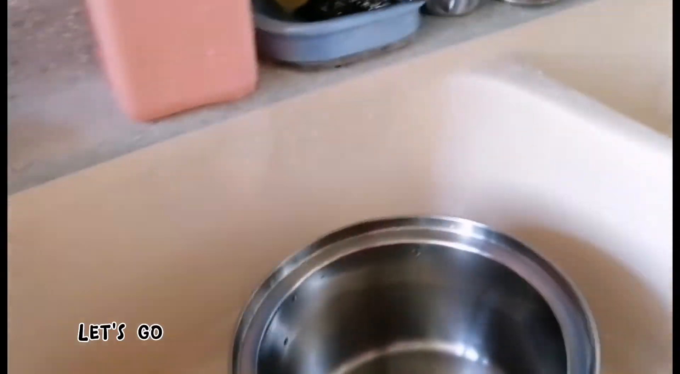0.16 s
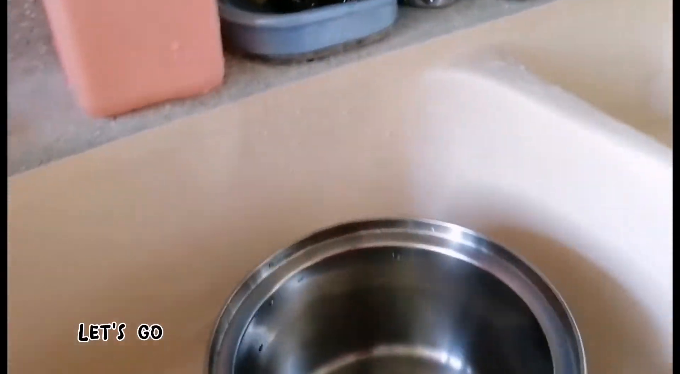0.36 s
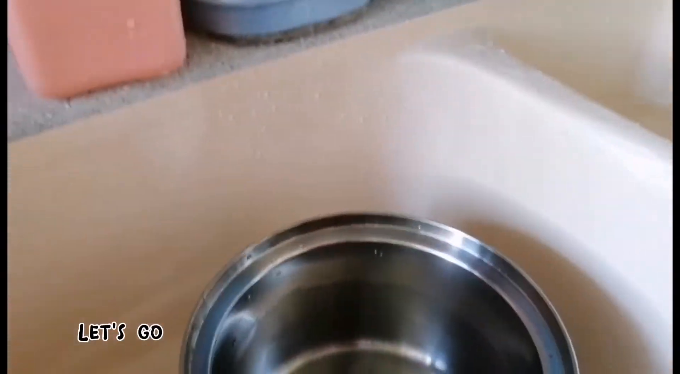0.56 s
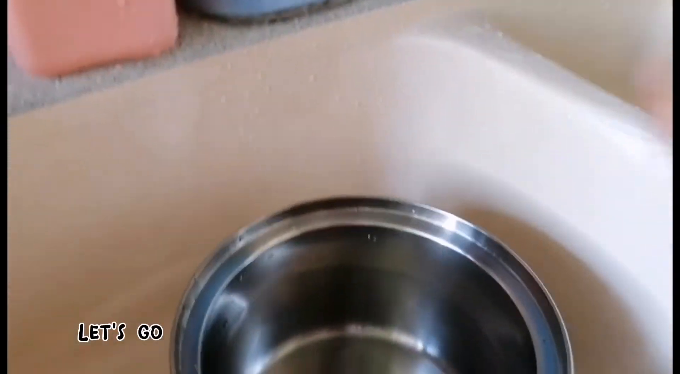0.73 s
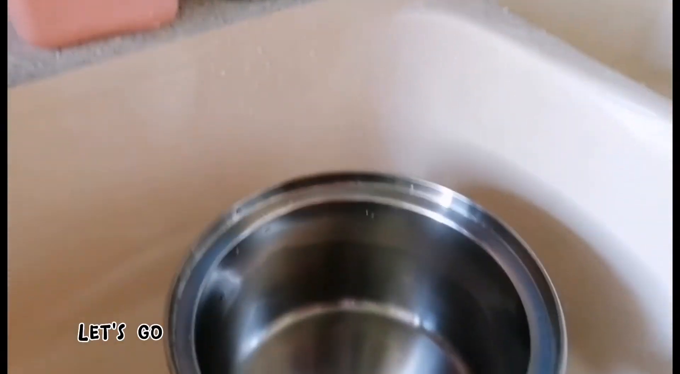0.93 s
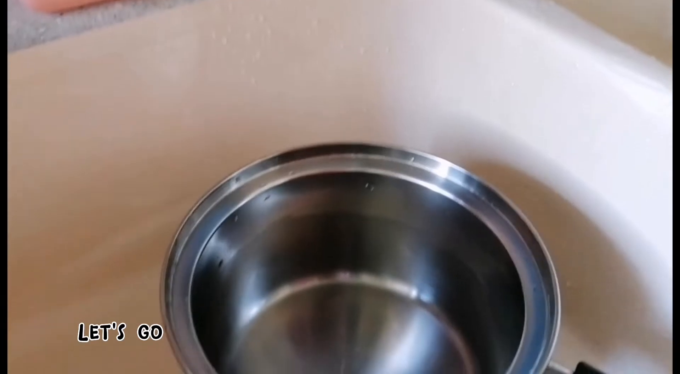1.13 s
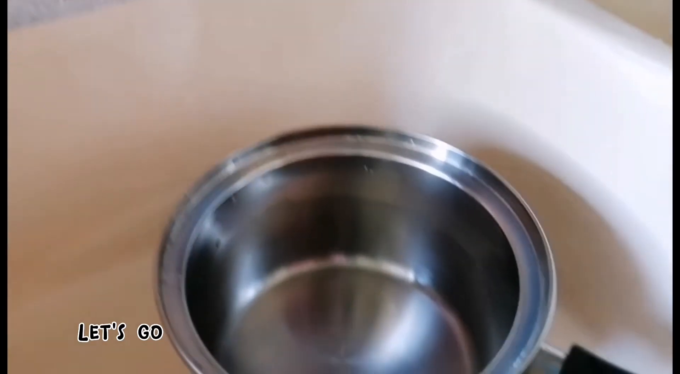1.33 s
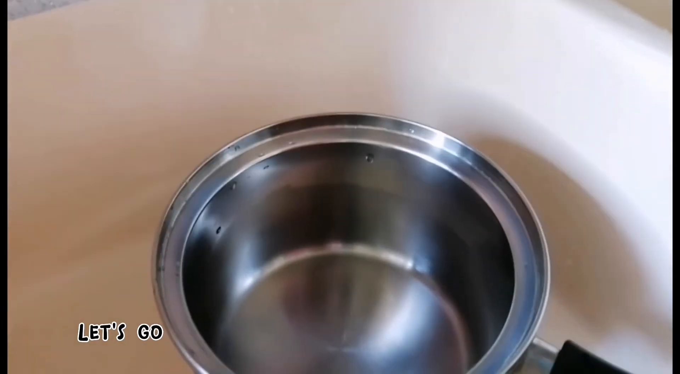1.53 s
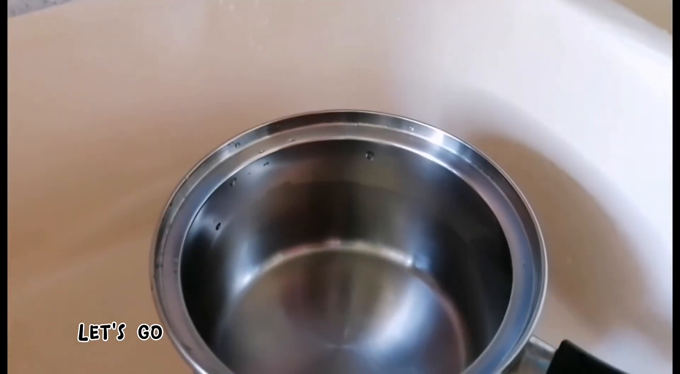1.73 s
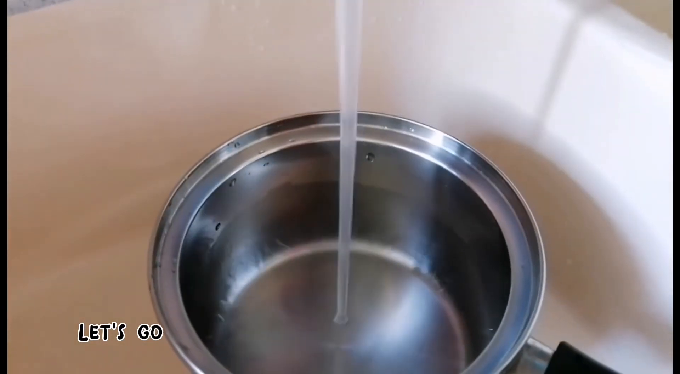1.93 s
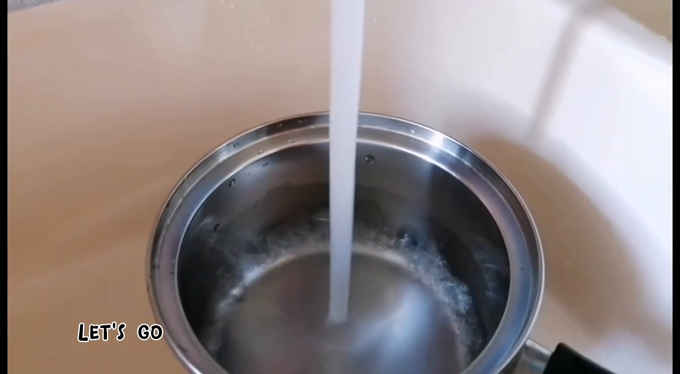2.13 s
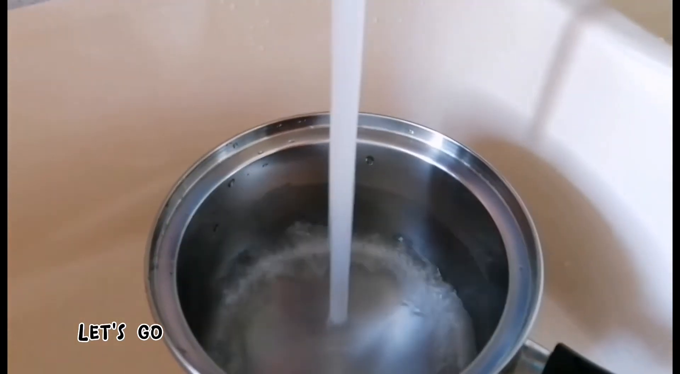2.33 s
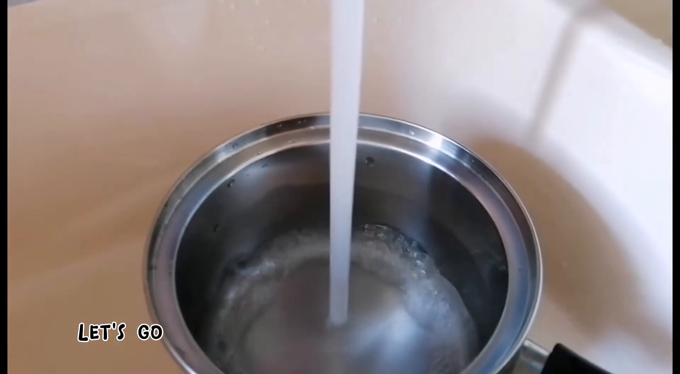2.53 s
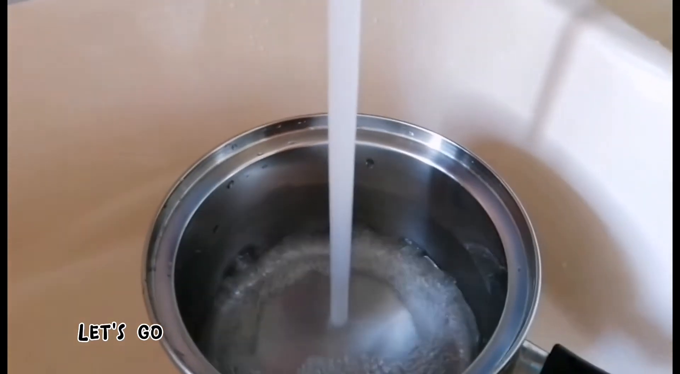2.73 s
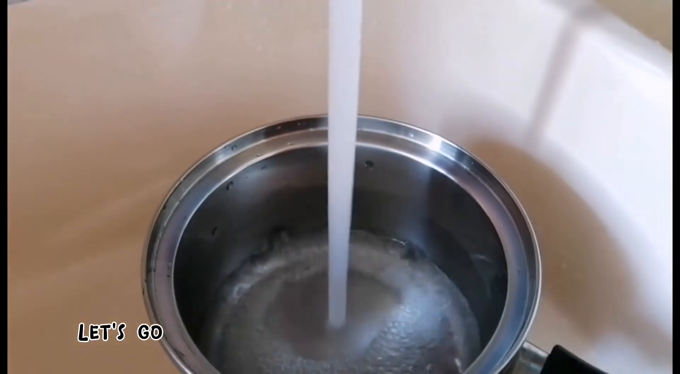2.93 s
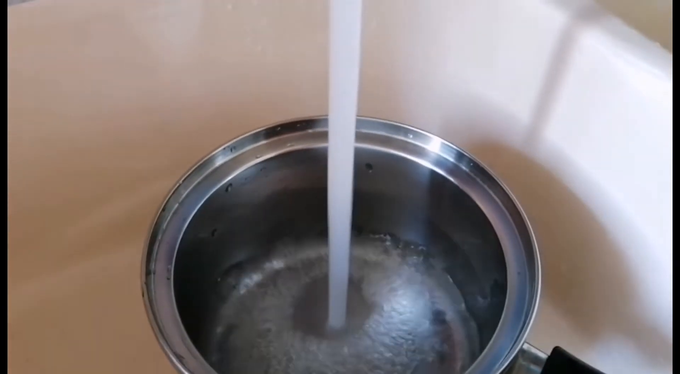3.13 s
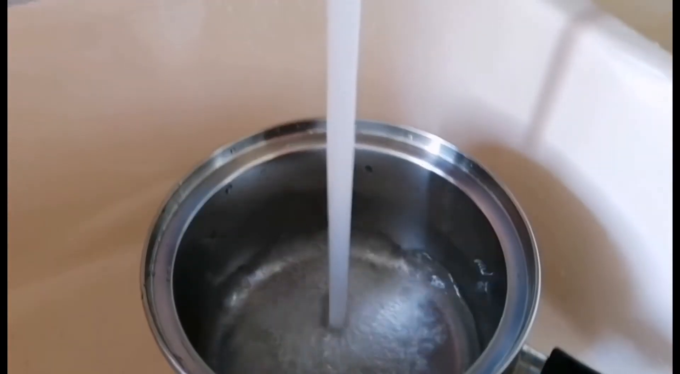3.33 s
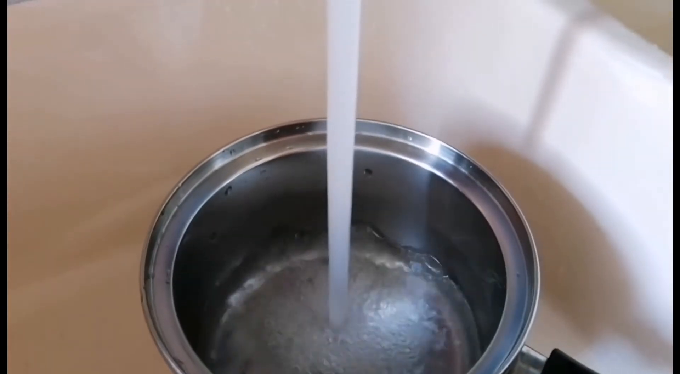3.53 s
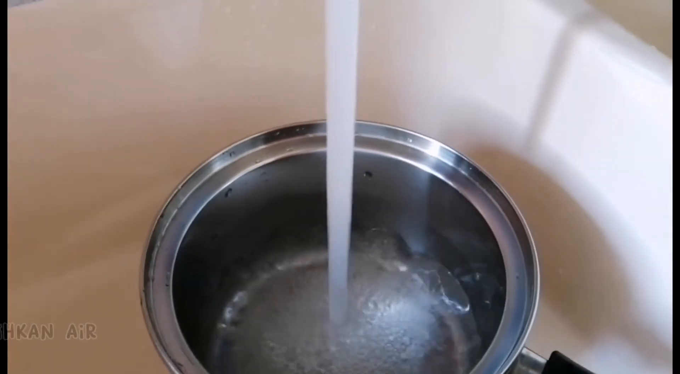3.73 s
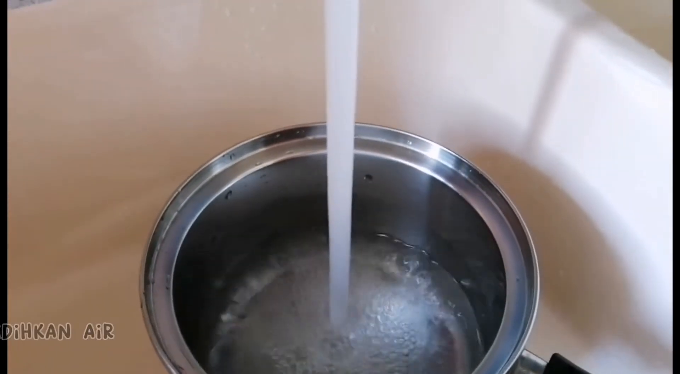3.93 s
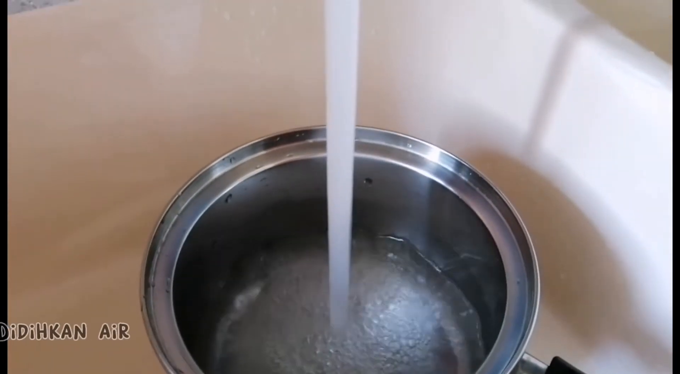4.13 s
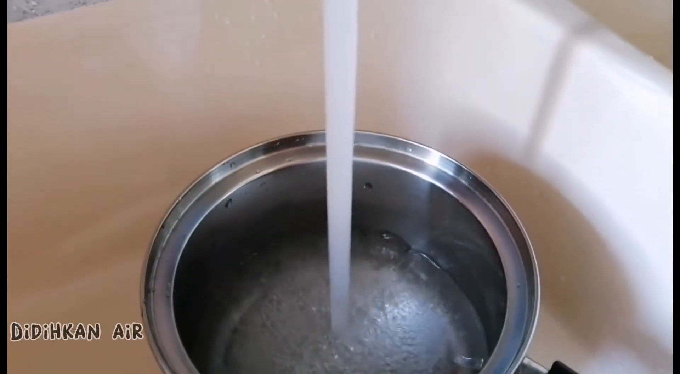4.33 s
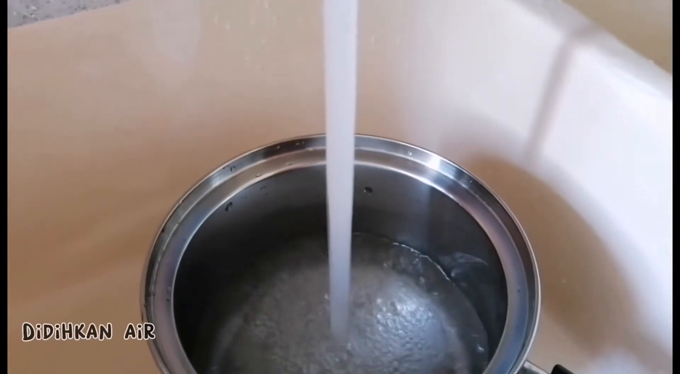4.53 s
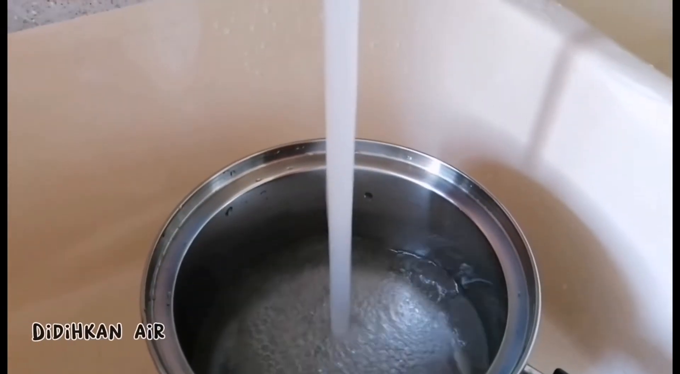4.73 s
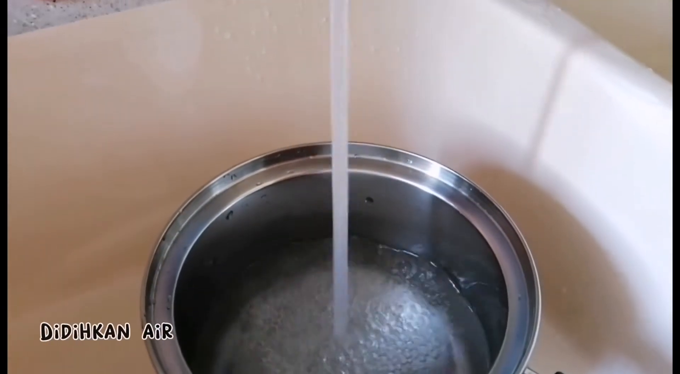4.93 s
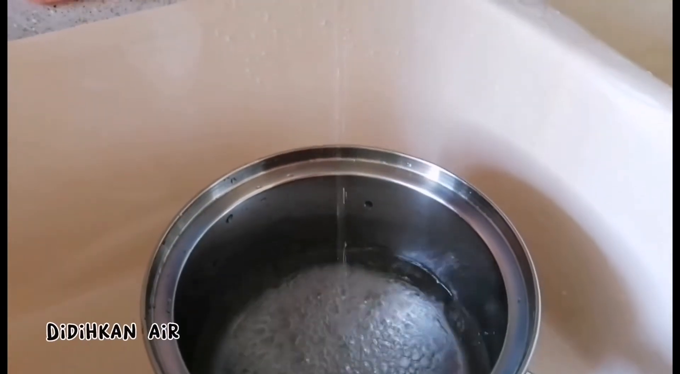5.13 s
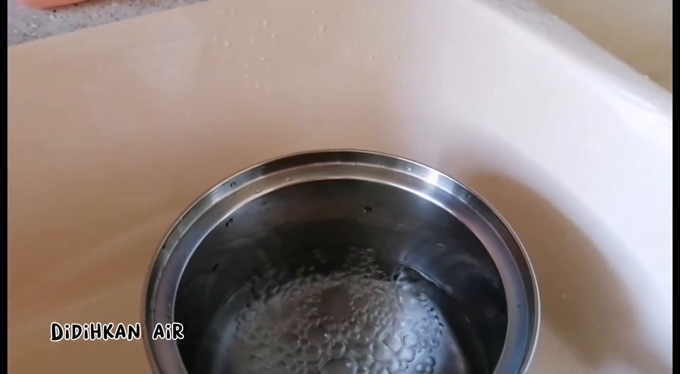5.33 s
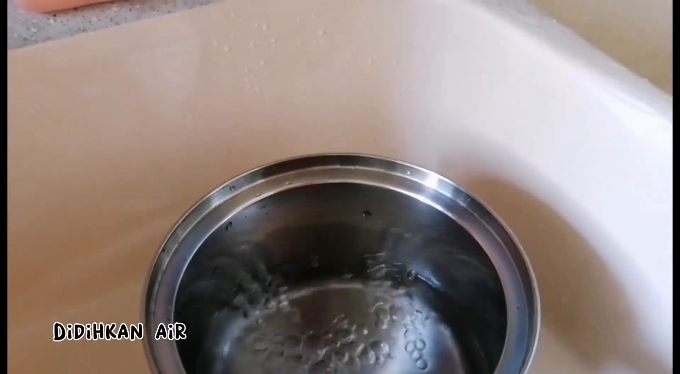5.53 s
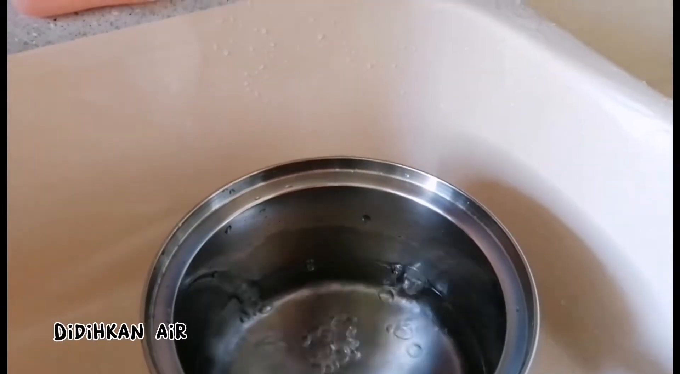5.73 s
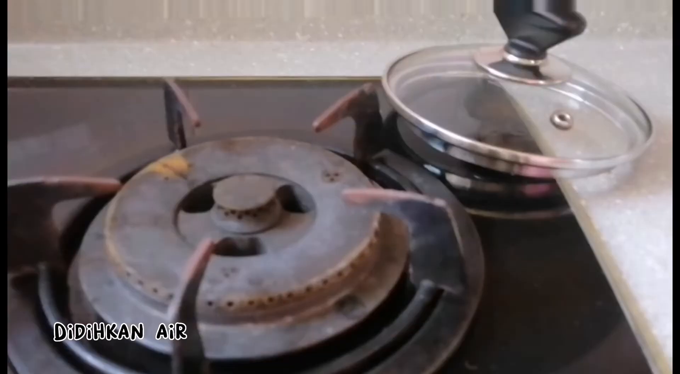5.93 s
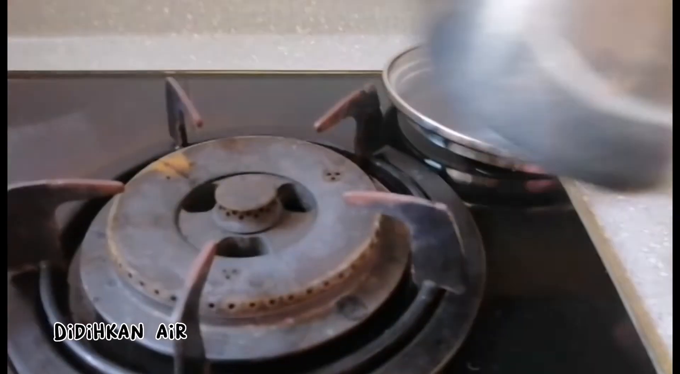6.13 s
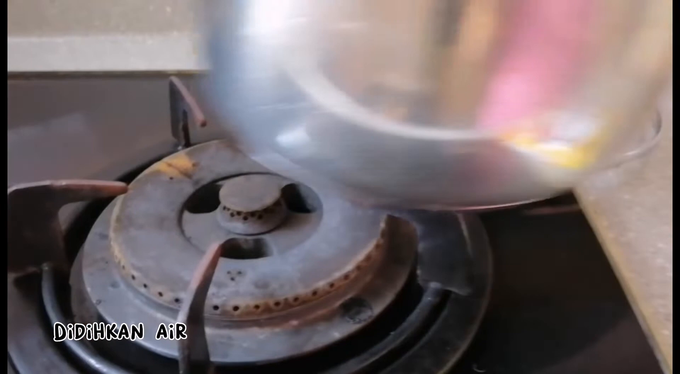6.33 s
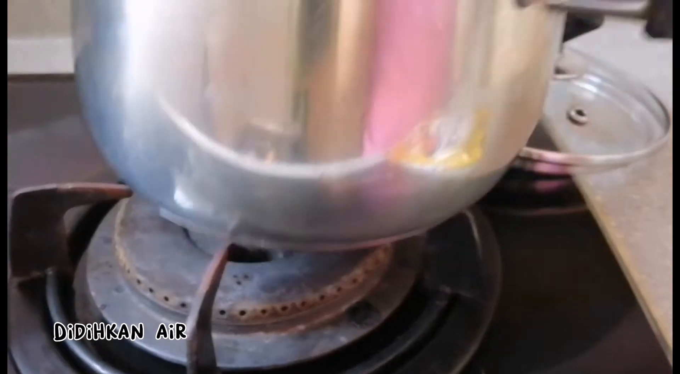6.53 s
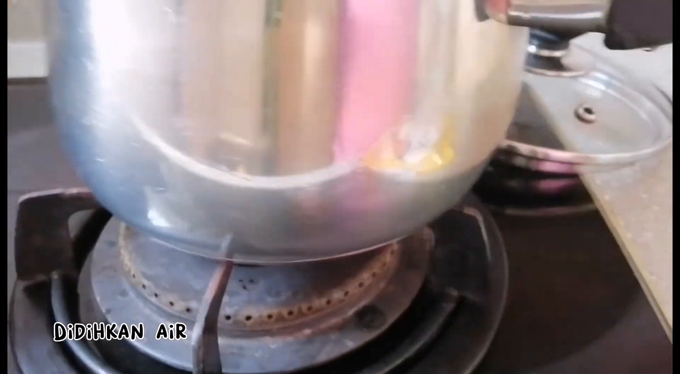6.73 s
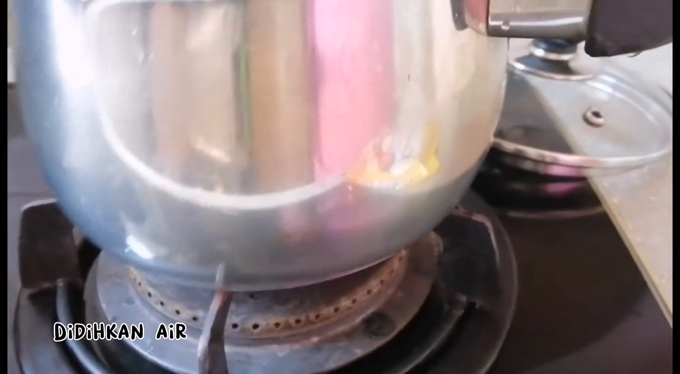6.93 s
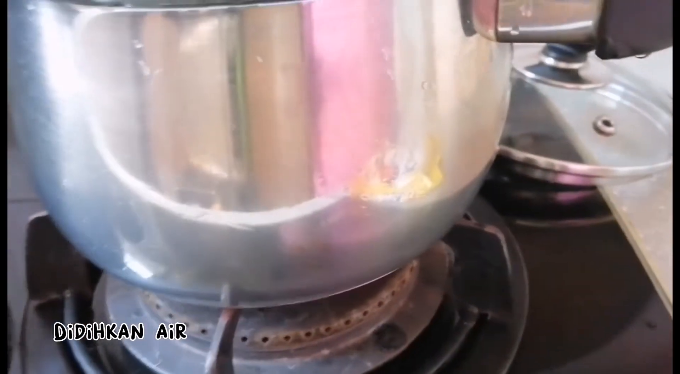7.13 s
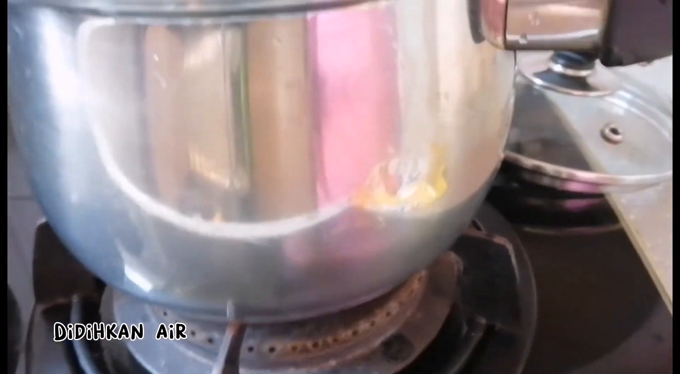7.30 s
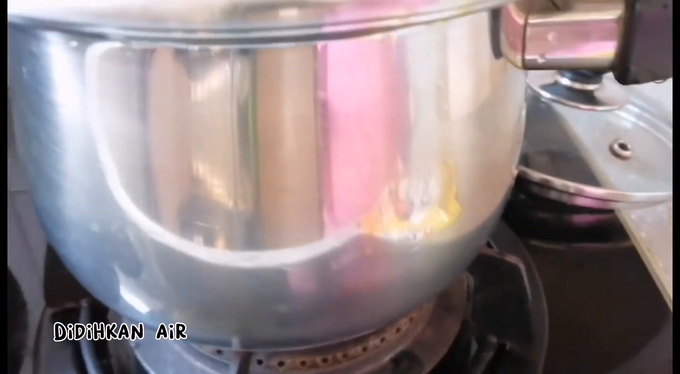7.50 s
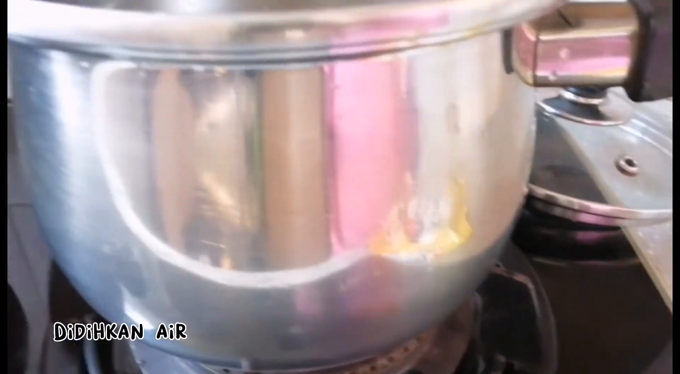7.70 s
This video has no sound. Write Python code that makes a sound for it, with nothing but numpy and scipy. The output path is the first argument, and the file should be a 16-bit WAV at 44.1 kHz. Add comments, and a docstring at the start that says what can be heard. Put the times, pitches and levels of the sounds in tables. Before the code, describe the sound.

Close up in a small kitchen with low appliance hum, an empty steel pot clanks hollowly in a sink and is nudged. A tap opens with a bright splashing hiss on bare metal, which turns deeper and gurgling as water gathers, then shuts off with trickle, drips and fizzing bubbles. After a brief total silence, the full pot bumps onto an iron grate and scrapes with short metallic squeals. Hand-held stereo phone microphone.

```python
"""In a kitchen, from close by, a hand-held phone with two microphone ports hears an empty steel pot set in the sink.
The tap opens, fills it and is shut, and the froth fizzes out: shaped noise, random droplet clicks, ringing modes.
After a silent pause the full pot is lowered onto a stove's iron grate, catches and is slid into place:
stick-slip clicks drive its modes. Hum, air and breeze lie behind; the room answers the blows."""
import sys
import numpy as np
from scipy import signal
from scipy.io import wavfile
from scipy.ndimage import uniform_filter1d

SR = 44100
rng = np.random.default_rng(int(sys.argv[2]) if len(sys.argv) > 2 else 0)


def wav_out(sig):
    """Save sig, one row per channel (or a flat mono array), as 16-bit PCM at SR to the path in sys.argv[1]."""
    wavfile.write(sys.argv[1], SR, np.round(np.clip(np.atleast_2d(sig).T, -1, 1) * 32767).astype(np.int16))


N = 342216


def from_db(db):
    """Amplitude factor of a level in dB."""
    return 10 ** (np.asarray(db) / 20)


def rms_one(x):
    """Scale to an overall rms of 1."""
    return x / np.sqrt(np.mean(x ** 2) + 1e-20)


def panned(pan_db):
    """Left and right gains; pan_db is how much louder the left port is."""
    return from_db(np.array([pan_db / 2, -pan_db / 2]))


def in_time(rows):
    """First sample of the span, and each column interpolated at every sample."""
    s, *columns = np.transpose(rows)
    at = np.arange(round(s[0] * SR), min(round(s[-1] * SR), N))
    return at[0], [np.interp(at / SR, s, c) for c in columns]


def add(out, start, sound):
    """Mix a sound in from a sample on, cut at the end."""
    start = max(start, 0)
    out[:, start:start + sound.shape[-1]] += sound[..., :N - start]


def at_hz(points, hz):
    """Level at a frequency, interpolated over log frequency."""
    points = np.array(points)
    return np.interp(np.log(hz), np.log(points[:, 0]), points[:, 1])


def ramp(t, start, length):
    """Straight rise from 0 to 1."""
    return np.clip((t - start) / length, 0, 1)


def shape_db(t, start, end, rise_db_per_s, fall_db_per_s):
    """0 dB from start to end, straight slopes in dB before and after."""
    return -rise_db_per_s * np.maximum(start - t, 0) - fall_db_per_s * np.maximum(t - end, 0)


def drift(rate, size):
    """Slow random wander of rms 1: noise low-passed near rate (Hz), made at every 40th sample."""
    r = np.exp(-80 * np.pi * rate / SR)
    noise = rng.standard_normal(size // 40 + 1002)
    slow = signal.lfilter([1], [1, -2 * r, r * r], noise)[1000:]
    return np.interp(np.arange(size) / 40, np.arange(len(slow)), rms_one(slow))


def band(x, low_hz, high_hz):
    """Keep one frequency band."""
    return signal.sosfilt(signal.butter(2, [low_hz, high_hz], "band", fs=SR, output="sos"), x)


def resonate(x, hz, width_hz):
    """Two-pole resonance with about unit gain at its peak."""
    r = np.exp(-np.pi * width_hz / SR)
    poles = [1, -2 * r * np.cos(2 * np.pi * hz / SR), r * r]
    return signal.lfilter(np.array([1, 0, -1]) * (1 - r * r) / 2, poles, x)


def ring(clicks, hz, t60, lead=0.):
    """A unit click starts a decaying sine of height 1; the left port leads by lead radians; the pitch may move."""
    spin = np.exp(2j * np.pi * np.cumsum(hz + 0 * clicks) / SR)
    decay = from_db(-60 / (t60 * SR))
    turn = spin * signal.lfilter([1], [1, -decay], (clicks + 1e-18) / spin)
    return np.array([turn.imag, (turn * np.exp(-1j * lead)).imag])


def wavering(hz, rate, lead, steady):
    """A mode driven partly by chance: a sine that swells and slips in phase; rms 1."""
    size = len(hz)
    swing = steady
    for share, r in ((0.71, rate), (0.49, 3 * rate)):
        swing = swing + share * (drift(r, size) + 1j * drift(r, size))
    turn = swing * np.exp(2j * np.pi * np.cumsum(hz) / SR)
    return rms_one(np.array([turn.real, (turn * np.exp(-1j * lead)).real]))


def grains(per_s, spread_db, size):
    """Random clicks of uneven size; their mean power does not depend on the rate."""
    sizes = from_db(spread_db * np.minimum(rng.exponential(1, size), 5)) * rng.choice([-1, 1], size)
    return rms_one(sizes) * (rng.random(size) < per_s / SR) * np.sqrt(SR / per_s)


# How alike the two ports hear a diffuse sound.
# Each row: frequency in Hz, left-right likeness from -1 to 1.
LIKENESS = [(30, .3), (130, 0.066), (400, 0.87), (640, -0.37), (1000, -0.12), (3000, -0.15), (7000, -0.17),
            (15000, -0.35)]


def banded(source, level_db, low_hz, patchy_db, top_hz=17000):
    """About third-octave bands of two sources, each with its own level, flicker and likeness at the ports."""
    size = source.shape[-1]
    out, together = 0, drift(36, size)
    edges = np.geomspace(low_hz, top_hz, round(3 * np.log2(top_hz / low_hz)))
    for k, (low, high) in enumerate(zip(edges, edges[1:])):
        mid, side = band(source, low, high) * (-1) ** k
        hz = np.sqrt(low * high)
        alike = np.clip(at_hz(LIKENESS, hz), -1, 1)
        flicker = np.minimum(0.51 * together + drift(18, size), 2)
        gain = from_db(level_db(hz) + patchy_db * flicker)
        out = out + gain * (np.sqrt(1 + alike) * mid + np.sqrt(1 - alike) * side * [[1], [-1]])
    return out


# Level of the low hum, one list at the sink and one at the stove. Each row: time in seconds, level in dB.
HUM_LEVEL = [
    [(0.0, -57.5), (1.5, -53.5), (2.3, -66.5), (3.4, -68.5), (3.95, -59), (4.8, -58.5), (5.6, -51.5),
     (5.91, -51)],
    [(6.32, -57.5), (6.75, -67), (7.05, -51.5), (7.76, -59.5)],
]
# Colour of the appliance hum. Each row: frequency in Hz, band weight in dB.
HUM_COLOUR = [(24, -33), (40, -2.5), (150, -2.5), (240, -9), (462, -9.5), (541, -17), (581, -14),
              (853, -29.5), (1200, -29), (1560, -56.5), (2640, -120)]
# Motor drone within the hum. Each row: frequency in Hz, width in Hz, level against the hum in dB.
HUM_LINES = [(60.7, 56, -9), (97.9, 3.3, -7), (140.75, 5.1, -1.5)]
# Colour of the faint air. Each row: frequency in Hz, band weight in dB.
AIR_COLOUR = [(500, 11.5), (1000, 6), (2000, -1.5), (3000, 1), (4000, -14), (6000, -6.5), (9000, -16.5),
              (15000, -13.5)]
AIR_DB = (-63.5, -68.5)   # at the sink, at the stove
HUM_USUAL_DB, BREEZE_DB, BREEZE_FOLLOWS = -58.5, -60.5, 1.9   # the breeze swings with the hum, but wider


def hush(out):
    """Background: appliance hum, faint air, and breeze on the ports, strongest on the left."""
    hum = rms_one(banded(rng.standard_normal((2, N)), lambda hz: at_hz(HUM_COLOUR, hz), 42.5, 3.5, top_hz=1390))
    for hz, width_hz, db in HUM_LINES:
        hum += from_db(db) * rms_one(resonate(rng.standard_normal(N), hz, width_hz))
    air = rms_one(banded(rng.standard_normal((2, N)), lambda hz: at_hz(AIR_COLOUR, hz), 444, 0.64))
    gusts_db = 3 * np.array([drift(6.1, N), drift(3, N)])
    breeze = rms_one(band(rng.standard_normal((2, N)), 8.7, 30)) * from_db([[5], [-6]] + gusts_db)
    for rows, air_db in zip(HUM_LEVEL, AIR_DB):
        start, (hum_db,) = in_time(rows)
        span = slice(start, start + len(hum_db))
        breeze_db = BREEZE_DB + BREEZE_FOLLOWS * (hum_db - HUM_USUAL_DB)
        add(out, start, from_db(breeze_db) * breeze[:, span])
        add(out, start, from_db(hum_db) * hum[:, span] + from_db(air_db) * air[:, span])


def fizz(size):
    """Clumps of small bubbles, each ringing briefly at one of 30 pitches."""
    clumps = from_db(1.53 * drift(8, size))
    total = 0
    for hz in np.geomspace(2000, 10000, 30):
        bubbles = np.array([grains(220, 3.0, size) for _ in range(2)])
        total = total + np.sqrt(hz) * resonate(bubbles, hz, hz / 60)
    return rms_one(total * clumps)


# The jet stops hitting steel and plunges into water.
PLUNGE_S, PLUNGE_TAKES_S = 3.302, 0.39
BARE_DEPTH = 0.1   # share of the water colour before the plunge
PAN_ON_STEEL_DB, PAN_ON_WATER_DB = -1.5, 1
DROPS_PER_S = 4500   # at each port
# Splash in the pot. Each row: time in seconds, level in dB before the colours below.
STREAM = [(1.68, -76), (1.732, -50.5), (2.13, -37.5), (2.21, -31), (3.4, -36), (3.6, -41.5), (3.92, -43),
          (4.2, -40), (4.87, -39.5), (5.06, -45), (5.13, -57), (5.78, -65.5), (5.91, -67.5)]
# Splash colour on bare steel. Each row: frequency in Hz, band weight in dB.
ON_STEEL = [(600, -34.5), (1000, -18), (1700, -16), (2500, -6.5), (3300, 0.5), (4000, -12), (5200, -1),
            (7000, 2.5), (8500, -2), (11000, -8), (15000, -9)]
# Splash colour on water. Each row: frequency in Hz, band weight in dB.
ON_WATER = [(600, 6), (1000, 4), (1700, -0.5), (2500, 8), (3350, 1), (4000, -5.5), (5200, 2), (7000, 1.5),
            (8500, 1.5), (11000, -3.5), (15000, -5)]
# Pot walls singing along. Each row: frequency in Hz, width in Hz, gain on the splash in dB.
WET_POT = [(1353, 86, 7), (2142, 68, -5), (2660, 54, -8), (3195, 45, -3), (5260, 90, -2)]


def flow():
    """Span of the stream: first sample, splash level, time, and how far the jet has plunged from 0 to 1."""
    start, (splash_db,) = in_time(STREAM)
    t = (start + np.arange(len(splash_db))) / SR
    return start, splash_db, t, ramp(t, PLUNGE_S, PLUNGE_TAKES_S)


def stream(out):
    """Bursting droplets over smooth spray; the colour warms as the jet plunges into water."""
    start, splash_db, t, plunged = flow()
    size = len(t)
    depth = BARE_DEPTH + (1 - BARE_DEPTH) * plunged
    pan_db = PAN_ON_STEEL_DB + (PAN_ON_WATER_DB - PAN_ON_STEEL_DB) * plunged
    drops = np.array([grains(DROPS_PER_S, 2.1, size) for _ in range(2)])
    spray = 0.41 * drops + 0.41 * rng.standard_normal((2, size)) + 0.4 * fizz(size)

    def colour(hz):
        return (1 - depth) * at_hz(ON_STEEL, hz) + depth * at_hz(ON_WATER, hz)

    splash = banded(spray, colour, 460, 2.17)
    splash += sum(from_db(db) * resonate(splash, hz, width_hz) for hz, width_hz, db in WET_POT)
    add(out, start, from_db(splash_db) * panned(pan_db) * splash)


TAP_OPEN_S, TAP_CLOSE_S, JET_DB = 1.71, 4.9, -38   # smooth jet at the spout, at full flow
OPENING_S, JET_HALF_DB, JET_SAG_DB_PER_S, CLOSING_DB_PER_S = 0.77, -5.5, 0.5, 103   # starts at part flow, sags, stops
PLUNGE_JET_DIP_DB = -11


def jet(out):
    """Smooth treble hiss at the spout; it dips at the plunge and recovers until the tap closes."""
    start, _, t, plunged = flow()
    jet_db = JET_DB + JET_HALF_DB * (1 - ramp(t, TAP_OPEN_S, OPENING_S))
    jet_db -= JET_SAG_DB_PER_S * (t - TAP_OPEN_S) * (1 - plunged)
    jet_db += PLUNGE_JET_DIP_DB * plunged * (1 - ramp(t, PLUNGE_S, TAP_CLOSE_S - PLUNGE_S))
    jet_db += shape_db(t, TAP_OPEN_S + 0.0051, TAP_CLOSE_S, 900, CLOSING_DB_PER_S)
    add(out, start, from_db(jet_db) * band(rng.standard_normal((2, len(t))), 6900, 17500))


def tap_whistle(out):
    """The half-open valve whistles: noise through a narrow resonance, swelling at random."""
    start, _, t, _ = flow()
    whistle = resonate(rng.standard_normal((2, len(t))), 1208, 90)
    whistle = rms_one(whistle * from_db(3.0 * drift(14, len(t))))
    edge_db_per_s = 279.5
    add(out, start, from_db(-53.5 + shape_db(t, 1.812, 2.05, edge_db_per_s, edge_db_per_s)) * whistle)


FROTH_FROM_S, FROTH_DB = 5, -61   # level before the band filters


def froth(out):
    """Single bubbles pop on the still surface: sparse band-limited clicks that wander left and right."""
    start, _, t, _ = flow()
    pops = grains(200, 3.4, len(t)) * panned(4 * drift(30, len(t))) * (t > FROTH_FROM_S)
    add(out, start, from_db(FROTH_DB) * band(band(pops, 4100, 7700), 4140, 13600))


SPLASH_S = 0.0029   # decay time constant
# The loudest single splashes. Each row: start in seconds, relative level in dB, centre in Hz.
SPLASHES = [(2.0345, -27, 7150), (2.1635, -19, 6880), (2.2079, -20, 6570), (2.3408, -28, 7200),
            (2.572, -25.5, 7580), (4.0572, -28, 5840), (4.4734, -19, 7250), (4.5177, -20, 6950),
            (4.567, -27, 6840), (4.659, -21, 6900)]


def splashes(out):
    """Short bright bursts of noise thrown off the stream."""
    t = np.arange(SR // 20) / SR
    for s, db, hz in SPLASHES:
        burst = np.exp(-t / SPLASH_S) * (1 - np.exp(-t / .001))
        noise = band(rng.standard_normal((2, len(t))), hz / 1.22, hz * 1.2)
        add(out, round(s * SR), from_db(db + 3.5) * burst * noise)


SPURT_S, SPURT_WALL_DB, SPURT_BUBBLES_DB, SPURT_FADE_DB_PER_S = 1.97, -58, -56, 77   # first water hits the empty pot
WALL_HZ, WALL_RISE_HZ = 657.6, 18   # pitch rises as the flow ends
WALL_PAN_DB, WALL_PAN_FULL_DB = 10, 0   # and the ring centres
# The plunging jet drives the lowest wall mode and big bubbles.
# Each row: time in seconds, wall level in dB, bubble level in dB.
GURGLE = [(2.97, -78, -83), (3.3, -73.5, -77), (4.08, -38.5, -52.5), (4.33, -36.5, -47.5),
          (4.96, -41, -39.5), (5.07, -42.5, -40.5), (5.18, -35, -44.5), (5.3, -38, -51.5),
          (5.345, -59, -77)]


def gurgle(out):
    """The plunging jet drives a narrow wall mode, rising in pitch as the flow ends, and short low bubbles."""
    t = np.arange(N) / SR
    s, wall_db, bubbles_db = np.transpose(GURGLE)
    spurt = shape_db(t, SPURT_S + 0.014, SPURT_S + 0.017, 450, SPURT_FADE_DB_PER_S)
    flowing = (t > SPURT_S) * (t < s[-1])
    wall = from_db(np.interp(t, s, wall_db)) * flowing + from_db(SPURT_WALL_DB + spurt)
    bubbling = from_db(np.interp(t, s, bubbles_db)) * flowing + from_db(SPURT_BUBBLES_DB + spurt)
    wall_hz = WALL_HZ + WALL_RISE_HZ * ramp(t, TAP_CLOSE_S - .1, 0.256)
    pan_db = WALL_PAN_DB + (WALL_PAN_FULL_DB - WALL_PAN_DB) * ramp(t, TAP_CLOSE_S - .55, 0.64)
    bubbles = sum(ring(grains(40, 2.7, N), hz, 47.0 / hz, lead=0.94) for hz in np.geomspace(420, 590, 8))
    add(out, 0, wall * panned(pan_db) * wavering(wall_hz, 29, lead=1.21, steady=0.57))
    add(out, 0, bubbling * rms_one(bubbles))


TRICKLE_START_S, TRICKLE_END_S, TRICKLE_HZ = 5.0, 5.24, 2560
TRICKLE_DB, TRICKLE_END_DB, PATTER_DB = -54, -47.5, -52   # high wall mode, the same at its end, broad splash
TRICKLE_FADE_DB_PER_S = 338


def trickle(out):
    """The last thread of water sings in a high wall mode and patters."""
    t, fade = np.arange(N) / SR, TRICKLE_FADE_DB_PER_S
    running = from_db(shape_db(t, TRICKLE_START_S, TRICKLE_END_S, fade, fade))
    last = from_db(shape_db(t, TRICKLE_END_S, TRICKLE_END_S, 2.9 * fade, fade))
    tone = wavering(TRICKLE_HZ + 0 * t, 48, lead=1.3, steady=0.44)
    add(out, 0, (from_db(TRICKLE_DB) * running + from_db(TRICKLE_END_DB) * last) * tone)
    patter = np.array([grains(1700, 3.4, N) for _ in range(2)])
    add(out, 0, from_db(PATTER_DB) * (running + 0.25 * last) * rms_one(band(patter, 550, 3500)))


# Last drops. Each row: start in seconds, relative level in dB, time to fall 60 dB in seconds.
DRIPS = [(5.131, -26.5, 0.18), (5.176, -29, 0.12), (5.239, -24, 0.059)]


def drips(out):
    """Each drop is a short soft noise push into two low modes."""
    for s, db, t60 in DRIPS:
        push = np.pad(np.hanning(300) * rng.standard_normal(300) / 14, (0, SR // 5))
        push = signal.lfilter([.15], [1, -.85], push)
        tones = ring(push, 680, t60, lead=1.1) + 0.59 * ring(push, 518, t60, lead=0.56)
        add(out, round(s * SR), from_db(db) * tones)


def boom(hz, t60):
    """A soft push into two low modes that beat."""
    push = np.pad(np.hanning(200) / 100, (0, SR // 2 - 200))
    return ring(push, hz, t60) - 0.23 * ring(push, 1.22 * hz, 1.9 * t60)


def tap_shut(out):
    """A low thump in the pipe as the tap is shut."""
    add(out, round(5.027 * SR), from_db(-32) * boom(67, 0.19))


THUD_SPREAD = 1.496   # the panels thud this ratio above and below their pitch
# Dull bumps on sink and stove, all levels relative. Each row: start in seconds, body level in dB, body in Hz,
# boom in Hz, knock, rattle and boom levels in dB, contact time constant in seconds, pan to the left in dB.
BUMPS = [(0.344, -8.5, 545, 155, -60, -38.5, -31, 0.0078, 0),
         (0.651, -24, 400, 72, -54, -36, -38.5, 0.023, 1.5),
         (1.176, -45, 400, 122, -75, -78, -56, 0.033, 1), (1.33, -32, 312, 150, -60, -74, -38.5, 0.017, 5),
         (1.504, -21.5, 406, 150.3, -56, -44.5, -23.5, 0.015, -2),
         (1.651, -44, 424, 149.4, -53, -73, -42, 0.047, -2),
         (6.733, -24, 413, 130.6, -30.5, -67, -38, 0.024, -1.5),
         (6.967, -28, 410, 61, -35.5, -62, -35.5, 0.032, 1),
         (7.03, -32, 412, 69.5, -28.5, -69, -40, 0.077, -4)]


def bumps(out):
    """The counter booms, its panels thud, and loose things knock and rattle while the contact lasts."""
    t = np.arange(SR // 2) / SR
    for s, body_db, body_hz, boom_hz, knock_db, rattle_db, boom_db, contact, pan_db in BUMPS:
        fade = np.exp(-t / max(contact, .002)) * (1 - np.exp(-t / 0.0012))
        shared, apart = grains(5000, 2.5, len(t)), rng.standard_normal((2, len(t)))
        push = np.pad(np.hanning(30) / 15, (0, len(t) - 30))
        thud = from_db(body_db - 6.5) * ring(push, body_hz, 1.4 * contact)
        panels = band(shared + 0.17 * apart, body_hz / THUD_SPREAD, body_hz * THUD_SPREAD)
        thud += from_db(body_db + 9.5) * panels * fade
        knock = from_db(knock_db + 2) * band(shared + 0.38 * apart, 470, 2200) * fade ** 1.9
        rattle = from_db(rattle_db - 3.0) * band(apart, 4500, 11500) * fade ** 0.99
        bump = from_db(boom_db) * boom(boom_hz, 0.25) + thud + knock + rattle
        add(out, round(s * SR), panned(pan_db)[:, None] * bump)


SHUFFLE_START_S, SHUFFLE_STOP_S, SHUFFLE_DB = 1.31, 1.5, -54.5   # pot nudged over the sink floor
SHUFFLE_SWELL_DB_PER_S, SHUFFLE_FADE_DB_PER_S = 252, 88
SHUFFLE_HZ, SHUFFLE_RING_DB = (770, 926), -4.5   # the held pot's low modes sing along


def shuffle(out):
    """The rub of pot on sink holds until the pot bumps to a stop, then dies."""
    t = np.arange(SHUFFLE_START_S - .15, SHUFFLE_STOP_S + .3, 1 / SR)
    rub = rms_one(band(grains(2000, 1.9, len(t)) + rng.standard_normal((2, len(t))), 180, 620))
    sung = sum(resonate(rub, hz, 31) * hz ** 3 for hz in SHUFFLE_HZ)
    rub += from_db(SHUFFLE_RING_DB) * rms_one(sung)
    rub *= from_db(2.7 * drift(22.0, len(t)))   # it judders
    level_db = SHUFFLE_DB + shape_db(t, SHUFFLE_START_S, SHUFFLE_STOP_S, SHUFFLE_SWELL_DB_PER_S, SHUFFLE_FADE_DB_PER_S)
    add(out, round(t[0] * SR), from_db(level_db) * rub)


# Empty pot meets the sink. Each row: start in seconds, relative level in dB,
# share of the free ring time from 0 to 1 (at least 0.05 is kept).
SET_DOWN = [(0.343, -9.5, 0.79), (0.651, -27, 0), (0.658, -21.5, 0.16), (0.665, -33, 0.16),
            (1.334, -41.5, 0.2), (1.507, -35.5, 0.2)]
# Modes of the empty pot. Each row: frequency in Hz, relative level in dB, free time to fall 60 dB in seconds.
EMPTY_POT = [(290, -13.5, 0.31), (510, -18, 0.08), (566, -6, 0.37), (607, -7, 0.33), (967, -21.5, 0.3),
             (1202, -22.5, 0.28), (1448, -1, 0.067), (1543, -14, 0.54), (1900, -27, .45), (2164, -32, .35),
             (2635, -18.5, 0.5), (2990, -11, 0.21), (3275, -15, 0.36), (5173, -26.5, .1),
             (6140, -28.5, 0.13)]
MINOR_DB, MINOR_T60_S = -33, .25   # many weak modes fill in between: relative level, free ring time


def set_down(out):
    """Blows ring the empty pot; each mode of the round wall is a close pair that beats; a hand mutes the ring."""
    minor = [(hz, MINOR_DB, MINOR_T60_S) for hz in np.geomspace(350, 3600, 24) * rng.uniform(.96, 1.04, 24)]
    for s, level_db, share in SET_DOWN:
        blow = np.zeros(SR // 2)
        blow[0], blow[round(.006 * SR)] = 1, .4
        blow = signal.lfilter(np.hanning(8) / 3.5, [1], blow)   # each contact lasts a few samples
        for hz, db, free_t60 in list(EMPTY_POT) + minor:
            t60 = free_t60 * np.clip(share, .05, 1)
            pair = ring(blow, hz, t60, lead=hz / 900)
            pair += 0.4 * ring(blow, hz + rng.uniform(15, 40), t60, lead=hz / 500)
            add(out, round(s * SR), from_db(level_db + db - 11.0) * pair)


# Full pot rubs on the grate. Each row: time in seconds, relative rub level in dB.
SLIDE = [(6.72, -79), (6.966, -84), (6.968, -54), (6.985, -44.5), (7.028, -56), (7.036, -46), (7.24, -55.5),
         (7.315, -39.5), (7.326, -28.5), (7.4, -35.5), (7.5, -38.5), (7.55, -34.5), (7.62, -39.5),
         (7.65, -46), (7.76, -55.5)]
# Its base catches. Each row: start in seconds, relative strike level in dB, hold in seconds,
# low wall level in dB (relative), low wall in Hz, squeal level in dB, squeal in Hz.
SLIPS = [(6.732, -39.5, 0.014, -58, 696, -52, 1493), (6.981, -36, 0.0087, -54, 705, -45, 1440),
         (7.031, -27, 0.011, -38, 696, -38, 1470), (7.083, -38, 0.019, -38, 676, -41.5, 1392),
         (7.288, -37, 0.013, -57, 710.6, -43, 1445), (7.324, -17.5, 0.009, -32.5, 697, -24.5, 1441),
         (7.353, -21, 0.012, -34, 708.5, -29, 1435), (7.371, -18, 0.0049, -35, 717, -21.5, 1441),
         (7.425, -34, 0.025, -32.5, 682, -40, 1340), (7.469, -23.5, 0.0033, -27, 660.6, -30.5, 1414),
         (7.484, -43, 0.025, -31, 665, -46, 1398), (7.532, -27.5, .02, -37, 690.5, -52, 1380),
         (7.573, -48, 0.023, -35, 688, -35.5, 1440), (7.606, -47, 0.012, -33, 634, -45, 1430),
         (7.674, -38.5, 0.0064, -38, 736, -42.5, 1445)]
WALL_FADE_DB_PER_S, SQUEAL_FADE_DB_PER_S, SLIP_RISE_DB_PER_S = 450, 702, 2500


def rubbing():
    """Span of the slide: first sample, rub level and time."""
    start, (rub_db,) = in_time(SLIDE)
    return start, rub_db, (start + np.arange(len(rub_db))) / SR


def slip_tones(out):
    """Each catch holds the low wall mode and a squeal for a moment; the tilting water retunes the wall."""
    start, rub_db, t = rubbing()
    s, _, hold, wall_db, wall_hz, squeal_db, squeal_hz = np.transpose(SLIPS)[:, :, None]

    def held(db, fade):
        return np.max(from_db(db + shape_db(t, s, s + hold, SLIP_RISE_DB_PER_S, fade)), axis=0)

    wall, squeal = held(wall_db, WALL_FADE_DB_PER_S), held(squeal_db, SQUEAL_FADE_DB_PER_S)
    latest = np.maximum(np.searchsorted(s[:, 0], t + 0.0032) - 1, 0)
    wall_hz, squeal_hz = [uniform_filter1d(hz[latest, 0], size=300) for hz in (wall_hz, squeal_hz)]
    wall_tone = panned(np.array([6.])) * wavering(wall_hz, 21, lead=1.84, steady=1.2)
    squeal_tone = panned(np.array([-3.])) * wavering(squeal_hz, 13.6, lead=0.33, steady=1.35)
    add(out, start, (1.1 * wall + from_db(rub_db - 8.5)) * wall_tone)
    add(out, start, (squeal + from_db(rub_db - 26)) * squeal_tone)


def grit_grains(size):
    """Dense clicks of grit under the base, unlike at the two ports, flickering together."""
    return np.array([grains(5900, 3.8, size) for _ in range(2)]) * from_db(2.9 * drift(16.4, size))


def groan(out):
    """The grate groans low under the last push: grit through one narrow resonance."""
    start, _, t = rubbing()
    tone = rms_one(resonate(grit_grains(len(t))[0], 353, 54))
    add(out, start, from_db(-41 + shape_db(t, 7.5, 7.61, 320, 150)) * tone)


GRIT_DB, GRIT_FOLLOWS = -43, 0.78   # grit before its band filter at a rub of -40 dB; share of the rub's swing
SLOSH_DETUNE = 0.0065   # rms share by which sloshing water shifts each mode
PUSH_S = (7.43, 7.52)   # the hand leans on the pot and other modes come forward
GRATE_T60_S, SLIDE_TOP_HZ = 0.084, 9000
# Modes of the full pot on the grate. Each row: frequency in Hz, relative level in dB,
# time to fall 60 dB in seconds, pan to the left in dB, radians the left leads, change while pushed in dB.
FULL_POT = [(1186, -8.5, 0.17, -6.5, 2.25, 3.5), (1340, -11.5, 0.1, 6.5, 1.6, 7.5),
            (1970, -14, 0.089, -2, 6.8, 12), (2068, -5, 0.14, -7, 3.6, 5), (2355, -2, 0.2, -2, 1.4, -8),
            (2837, -6.5, 0.079, -7, 0.26, -0.5), (2830, -10, 0.068, 2, 4.6, -1),
            (3216, -11, 0.082, 3, 1.4, 6)]
# Iron bars of the grate. Each row: frequency in Hz, relative level in dB.
GRATE = [(4460, -10.5), (4760, -13), (5180, -8), (5450, -6), (5790, -5), (6240, -10.5), (6480, -16),
         (6890, -18), (7280, -14), (8180, -13), (9880, -17.5)]


def slide(out):
    """Stick-slip clicks and short catches ring the full pot and grate; the moving contact favours changing modes."""
    start, rub_db, t = rubbing()
    size = len(t)
    catch_s, catch_db = np.transpose(SLIPS)[:2]
    catches = np.zeros(size)
    catches[np.clip(np.round(catch_s * SR).astype(int) - start, 0, size - 1)] = from_db(catch_db - 29.0)
    # each catch strikes, then judders briefly
    judder = signal.lfilter([1], [1, -np.exp(-1 / (0.008 * SR))], catches)
    chatter = grains(250, 2.8, size)   # random clicks shared by all modes
    pushed = from_db(shape_db(t, *PUSH_S, 400, 140))
    bars = []
    for hz, db in GRATE:
        for apart in (1, rng.uniform(1.01, 1.05)):   # unlike pairs
            pan_db, lead = rng.uniform(-3, 4, 2)
            bars.append((hz * apart, db - 4.0, GRATE_T60_S, pan_db, lead, 0))
    sound = 0
    for hz, db, t60, pan_db, lead, push_db in list(FULL_POT) + bars:
        favour_db = 3.9 * drift(12.6, size)
        drive = (grains(600, 4.9, size) + 0.7 * chatter) * from_db(rub_db - 31 + favour_db)
        drive = drive + 8.8 * catches + 0.74 * judder * rng.standard_normal(size)
        drive = drive * from_db(push_db * pushed)
        moving_hz = hz * (1 + SLOSH_DETUNE * drift(8.8, size))
        sound = sound + from_db(db) * panned(pan_db)[:, None] * ring(drive, moving_hz, t60, lead)
    grit = grit_grains(size)
    grit_db = GRIT_DB + GRIT_FOLLOWS * (rub_db + 40.0)
    sound = sound + from_db(grit_db) * band(grit, 4300, 9500)
    sound = sound + from_db(rub_db + 4.0) * band(grit, 310, 3000)
    add(out, start, signal.sosfilt(signal.butter(1, SLIDE_TOP_HZ, fs=SR, output="sos"), sound))


ROOM_T60_S, ROOM_DB = 0.21, -10.5


def kitchen(hits):
    """The room: a dense dying tail, its own at each port, duller than the blow."""
    t = np.arange(round(.6 * SR)) / SR
    tail = band(rng.standard_normal((2, len(t))), 220, 6500) * from_db(-60 * t / ROOM_T60_S) * (t > .003)
    tail /= np.sqrt(np.sum(tail ** 2) / 2)
    return from_db(ROOM_DB) * signal.fftconvolve(hits, tail, axes=1)[:, :N]


def scene():
    """Hush and water stay dry; bumps, rubs and blows also sound in the room."""
    steady, hits = np.zeros((2, 2, N))
    for source in (hush, stream, jet, tap_whistle, froth, splashes, gurgle, trickle, drips):
        source(steady)
    for source in (tap_shut, bumps, shuffle, set_down, slip_tones, groan, slide):
        source(hits)
    return steady + hits + kitchen(hits)


# Inlet resonances of the two microphone ports, left then right.
# Each row: frequency in Hz, width in Hz, level of the added resonance in dB.
PORTS = [(8410, 660, 4), (6990, 430, 9)]
PAUSE_S = (5.913, 6.312)   # silent from, to
CUTOFF_HZ = 15700


def record(dry):
    """Each inlet lifts its own treble band; the sound stops for the pause; the top is cut."""
    heard = np.array([x + from_db(db) * resonate(x, hz, width_hz) for x, (hz, width_hz, db) in zip(dry, PORTS)])
    t = np.arange(N) / SR
    heard *= np.clip(np.maximum(PAUSE_S[0] - t, t - PAUSE_S[1]) / 0.0019, 0, 1)
    return signal.sosfilt(signal.cheby2(26, 70, CUTOFF_HZ, fs=SR, output="sos"), heard)


dry = scene()
out = record(dry)
wav_out(out)
```